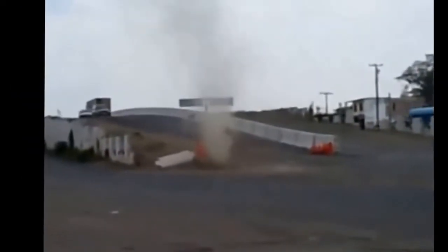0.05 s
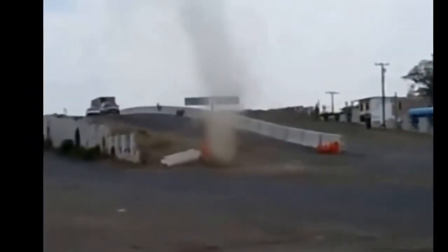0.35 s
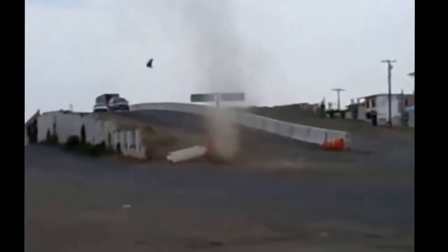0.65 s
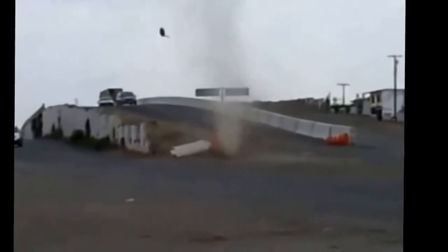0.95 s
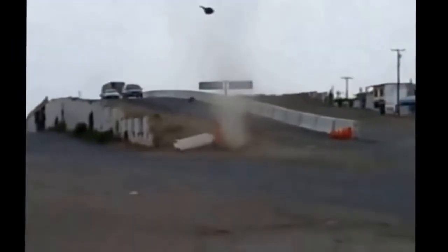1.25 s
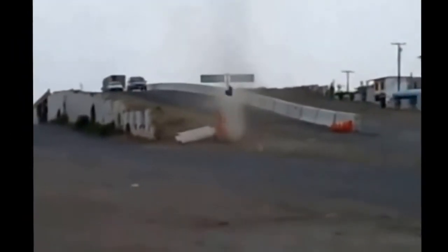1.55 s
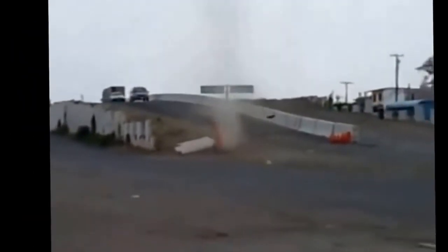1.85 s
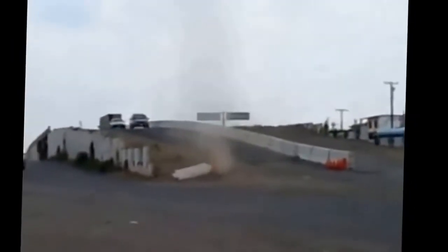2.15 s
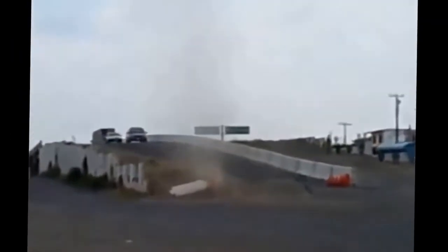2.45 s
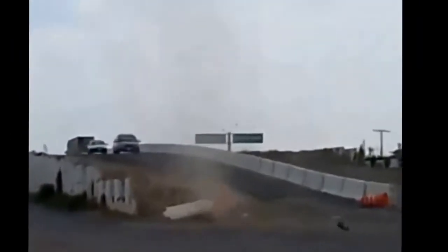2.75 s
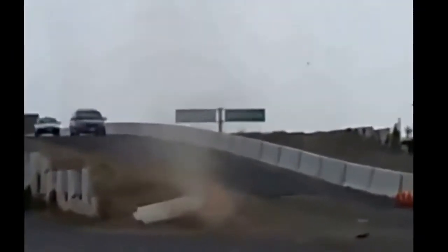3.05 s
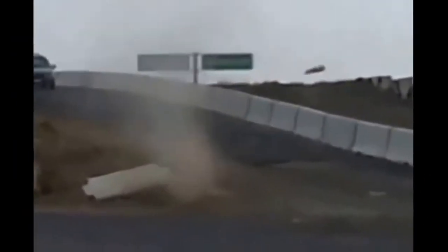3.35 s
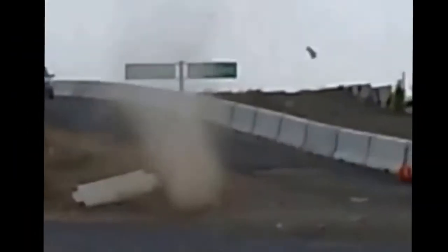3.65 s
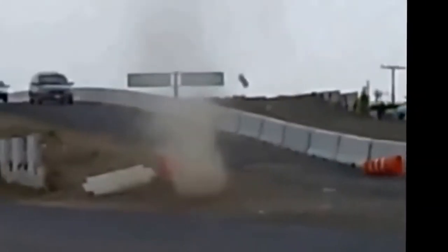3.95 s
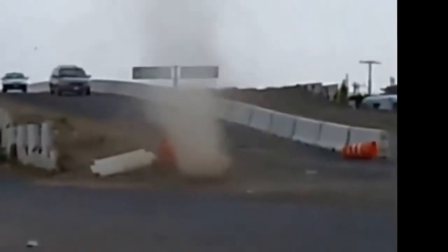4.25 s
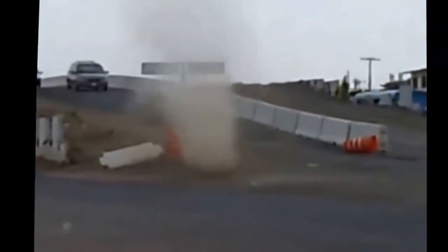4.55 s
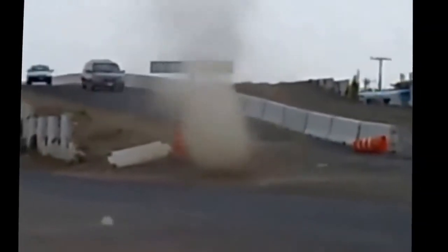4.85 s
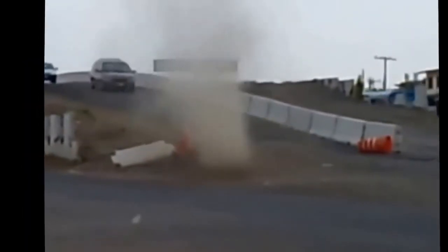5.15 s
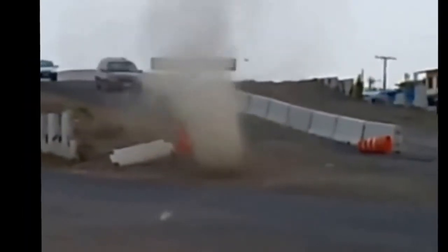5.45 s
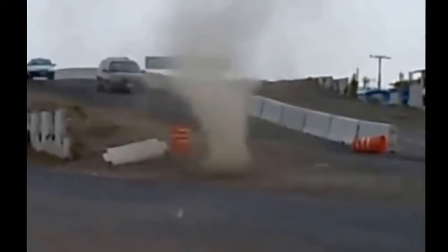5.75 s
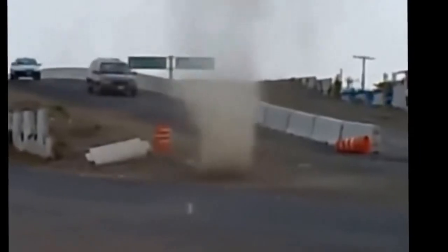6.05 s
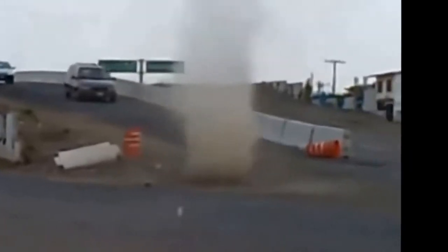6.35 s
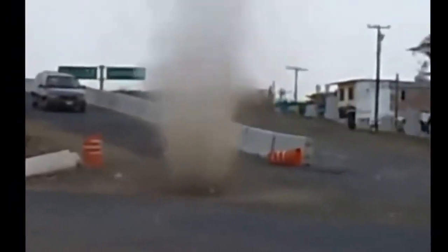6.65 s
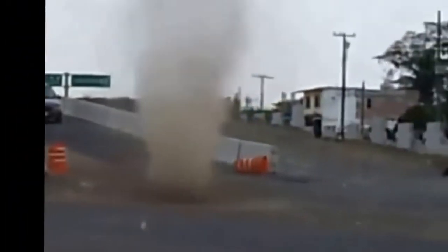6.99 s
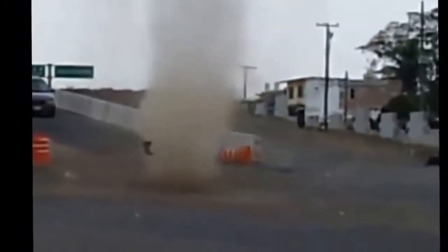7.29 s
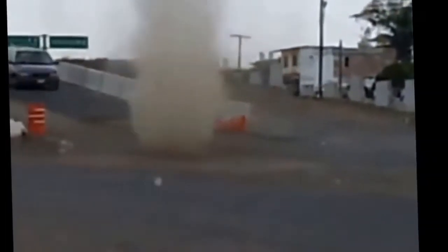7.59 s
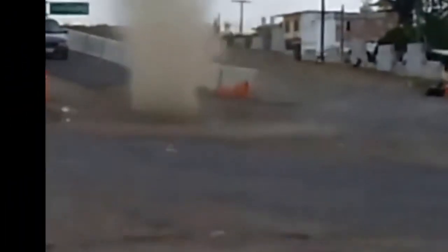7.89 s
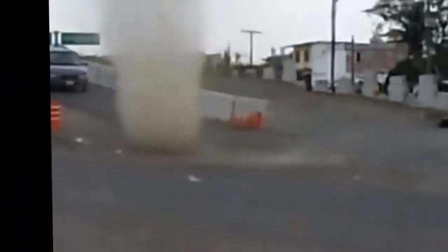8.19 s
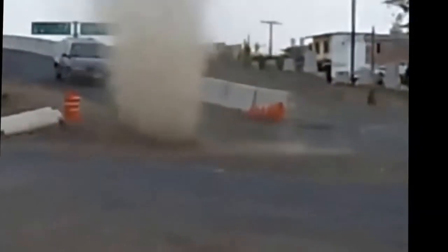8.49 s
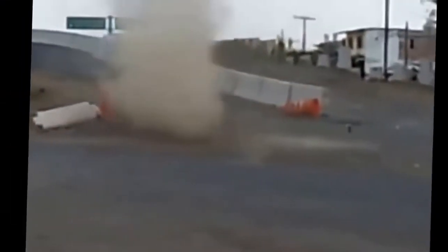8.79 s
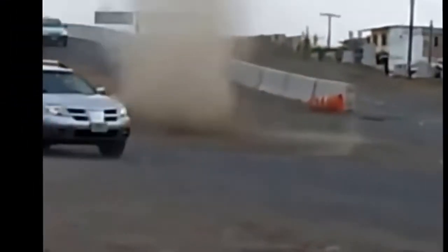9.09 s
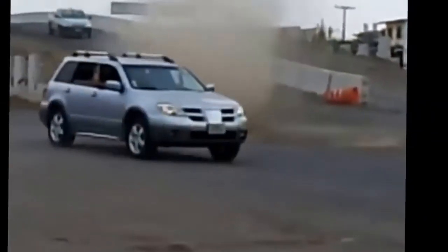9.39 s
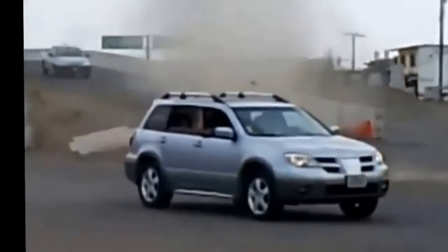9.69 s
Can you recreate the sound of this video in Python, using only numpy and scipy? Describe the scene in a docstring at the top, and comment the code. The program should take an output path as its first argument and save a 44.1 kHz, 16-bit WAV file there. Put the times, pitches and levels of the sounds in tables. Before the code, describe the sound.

Wind roars on a small camera's stereo microphone at an open roadside lot. The hardest gusts come between 0.1 and 0.7 seconds, with low thumps, rasping crackle and sharp ticks. Lighter gusts and airy swishes follow until about 3 seconds, with a few more crackles near 1.2 seconds. Another strong surge buffets the microphone from 3 to 4 seconds, then duller, rumbling gusts continue until nearly 6 seconds. Underneath throughout are the distant low roar of a dust devil and the road, a hum of car engines, a faint hiss of blown dust and a thin, wavering, breathy whistle. From about 6 seconds the close wind is much weaker, leaving the far roar and the engines, which swell and fade unevenly. Soft swishes pass between 7 and 8 seconds, and one small low buffet comes at 9.6 seconds, just before the end.

```python
"""A roadside lot, a dust devil whirling over it, heard on a small camera's stereo microphone.
Close up, gusts roar and swish past and eddies buffet the ports; the hardest gusts make them crackle.
Farther off are the roar of whirlwind and road, a hiss of blown dust, the thin whistle of the vortex
and the hum of traffic. After five seconds the wind eases and leaves the far roar and the engines."""
import sys
import numpy as np
from scipy import signal
from scipy.fft import rfft, irfft
from scipy.io import wavfile
from scipy.ndimage import uniform_filter1d, minimum_filter1d

SR = 44100
rng = np.random.default_rng(int(sys.argv[2]) if len(sys.argv) > 2 else 0)


def unload_wav(signal):
    """Save mono or channel-first audio to the path in sys.argv[1] as 16-bit WAV at rate SR, clipped to [-1, 1]."""
    wavfile.write(
        sys.argv[1],
        SR,
        np.round(np.clip(np.atleast_2d(signal).T, -1, 1) * 32767).astype(np.int16),
    )


N = 429093
TIME = np.arange(N) / SR
FREQ = np.fft.rfftfreq(N, 1 / SR)
BAND_LIMIT_HZ = 10080

# colour of a snap on the microphone: (frequency [Hz], relative level [dB])
SNAP_COLOUR = [(500, -5.5), (1300, 4), (2200, 5.5), (3200, -2), (4500, -5.5), (5500, -11.5), (7000, -17),
               (8500, -22), (10000, -27.5)]


def gain_of(db):
    """Decibels to amplitude."""
    return 10 ** (np.asarray(db) / 20)


def unit_rms(x):
    """Scales to rms 1."""
    return x / np.sqrt(np.mean(x ** 2) + 1e-20)


def over_frequency(points):
    """A table over log frequency, read at every bin."""
    hz, value = np.transpose(points)
    return np.interp(np.log(FREQ + 1), np.log(hz + 1), value)


def over_time(rows, column=1):
    """One column of a table over time, read at every sample."""
    rows = np.asarray(rows)
    return np.interp(TIME, rows[:, 0], rows[:, column])


def white_spectrum():
    """The spectrum of a fresh white noise."""
    return rng.standard_normal(len(FREQ)) + 1j * rng.standard_normal(len(FREQ))


def wander(rate_hz):
    """A random drift of rms 1, with little above the rate."""
    return unit_rms(irfft(white_spectrum() / (1 + (FREQ / rate_hz) ** 4), N))


def port_noise(colour):
    """Coloured noise at two close microphone ports: a common part plus and minus a small separate one."""
    # likeness of left and right: (frequency [Hz], coherence [0-1])
    coherence = [(30, .92), (70, 1), (130, 1), (300, 1), (550, 0.99), (1100, 0.97), (2200, 1), (3200, 0.91),
                 (4600, 0.96), (9600, 0.89)]
    alike = np.clip(over_frequency(coherence), 0, 1)
    common = np.sqrt(1 + alike) * white_spectrum()
    separate = np.sqrt(1 - alike) * white_spectrum()
    pair = np.array([common + separate, common - separate])
    return unit_rms(irfft(pair * gain_of(over_frequency(colour)), N))


def fuzzy_tone(t, hz, width_hz, steadiness):
    """A narrow band of noise round hz, from 24 scattered partials; steadiness 0-1 evens out its height."""
    offset, phase = rng.standard_normal((24, 1)), rng.random((24, 1))
    coarse_t = np.arange(t[0], t[-1] + .002, .001)
    band = np.exp(2j * np.pi * (offset * width_hz / 2 * coarse_t + phase)).sum(0)
    band = band / (abs(band) + 1) ** np.clip(steadiness, 0, 1)
    return unit_rms((np.interp(t, coarse_t, band) * np.exp(2j * np.pi * hz * t)).real)


def hump(start, length, attack, release):
    """Height 0-1 over the whole scene: rises, holds, and is gone at the end of its length."""
    return np.clip(np.minimum((TIME - start) / attack, (start + length - TIME) / release), 0, 1)


def burst(start, length, rise_s):
    """A flat-topped burst that falls half as fast as it rises: its samples and its height."""
    at = np.arange(max(int(start * SR), 0), min(int((start + length) * SR), N))
    t = TIME[at]
    return at, np.clip(np.minimum(t - t[0], (t[-1] - t) / 2) / rise_s, 0, 1)


def wind_strength(attack_s=0.018, release_s=0.066, rush_db_per_roar_db=0.36):
    """Amplitudes of rumble, roar and rush: gusts add power to the breeze; the rush follows the roar."""
    # steady wind under the gusts: (time [s], rumble [dB], roar [dB], rush [dB])
    breeze = [(0, -32, -25.5, -28.5), (1.05, -27.5, -20, -34), (2.17, -31, -27.5, -40.5),
              (2.65, -25.5, -22.5, -39), (3.1, -25.5, -22.5, -41), (3.3, -22.5, -22, -40),
              (3.6, -24, -26, -46.5), (4.15, -27, -22.5, -45.5), (4.9, -29, -26, -43),
              (5.8, -34.5, -28.5, -49), (9.73, -37, -29.5, -48.5)]
    # gusts sweeping over the microphone: (start [s], length [s], rumble [dB], roar [dB])
    gusts = [(0.109, 0.24, -19.5, -13), (0.333, 0.15, -24.5, -14.5), (0.522, 0.13, -24, -12.5),
             (0.818, 0.12, -21, -23), (1.158, 0.27, -26.5, -23.5), (1.53, 0.057, -31, -25),
             (1.715, 0.13, -38.5, -26), (1.945, 0.19, -35, -23.5), (2.22, 0.35, -28, -32),
             (2.952, 0.26, -22.5, -30), (3.166, 0.42, -26, -21), (3.302, 0.14, -28, -21),
             (3.792, 0.26, -27.5, -20), (4.296, 0.21, -26, -26.5), (4.579, 0.29, -25, -24.5),
             (5.032, 0.17, -27, -28), (5.485, 0.15, -23, -26.5), (5.783, 0.17, -32.5, -29.5),
             (6.9, .4, -35, -39.5)]
    rumble_power = gain_of(over_time(breeze, 1)) ** 2
    calm_power = gain_of(over_time(breeze, 2)) ** 2
    roar_power = calm_power
    for start, length, rumble_db, roar_db in gusts:
        power = hump(start, length, attack_s, release_s) ** 2
        rumble_power = rumble_power + power * gain_of(rumble_db) ** 2
        roar_power = roar_power + power * gain_of(roar_db) ** 2
    rush_lift = np.sqrt(roar_power / calm_power) ** rush_db_per_roar_db
    return np.sqrt(rumble_power), np.sqrt(roar_power), gain_of(over_time(breeze, 3)) * rush_lift


def wind(rumble_trim_db=-1, rush_trim_db=-1, lumpy_db=2.0, flutter_db=2.0, swell_db=1.13, dull_hz=260):
    """Turbulence at the microphone: a lumpy rumble, and a roar and rush that swell and flutter as one."""
    # colours of the wind's low, middle and airy parts: (frequency [Hz], relative level [dB])
    rumble_colour = [(15, -24.5), (35, -26), (55, -17), (68, -10.5), (82, -4), (100, -1), (125, 1.5),
                     (152, -5), (185, -1.5), (230, -1.5), (330, -26.5), (600, -61.5)]
    roar_colour = [(110, -28), (170, -6.5), (235, -3.5), (310, -1), (380, -4.5), (425, -6), (465, -3),
                   (590, -10), (720, -11.5), (1000, -20), (1400, -34.5), (3000, -73.5)]
    rush_colour = [(400, -21), (700, -3.5), (900, 2.5), (1100, -3), (1300, 2.5), (1650, -6.5), (2000, -5.5),
                   (2600, -15), (3400, -21.5), (4500, -31.5), (9000, -52)]
    # slower air sheds larger eddies, so the roar loses its top: (time [s], dull share [0-1])
    dullness = [(0, 0.01), (3.2, 0.11), (4.4, 0.93), (5.3, 0.55), (9.73, 0.6)]
    lumps, flutter, swell = lumpy_db * wander(8.8), flutter_db * wander(28), swell_db * wander(9.1)
    rumble_gain, roar_gain, rush_gain = wind_strength()
    full = port_noise(roar_colour)
    dull = unit_rms(irfft(rfft(full) / (1 + (FREQ / dull_hz) ** 2), N))
    share = np.clip(over_time(dullness), 0, 1)
    rumble = port_noise(rumble_colour) * rumble_gain * gain_of(rumble_trim_db + lumps)
    roar = ((1 - share) * full + share * dull) * roar_gain * gain_of(swell + 0.48 * flutter)
    rush = port_noise(rush_colour) * rush_gain * gain_of(rush_trim_db + swell + flutter)
    return rumble + roar + rush


def far_roar(level_db=-26.5, waver_db=.5):
    """The whirlwind and the road from a distance: a low roar that wavers slightly."""
    # colour of the far roar: (frequency [Hz], relative level [dB])
    colour = [(40, -31), (100, -5), (170, -4), (250, 1), (300, -3), (385, -1.5), (405, -7), (420, -13.5),
              (460, -6), (505, -10), (560, -5.5), (620, -10), (690, -12.5), (780, -21.5), (870, -20.5),
              (1000, -20), (1150, -27.5), (1500, -27.5), (1950, -31), (2800, -49.5)]
    return port_noise(colour) * gain_of(level_db + waver_db * wander(16.0))


def dust_hiss(shimmer_db=1.0):
    """Dust blown across the lot: a fine, shimmering hiss."""
    # colour of the hiss: (frequency [Hz], relative level [dB])
    colour = [(1200, -14.5), (2000, 14), (2700, 8), (3600, 3), (4400, 2), (5300, -4.5), (6400, -2),
              (7300, -8), (8600, -4.5), (10000, -30)]
    # rise and fall of the hiss: (time [s], level [dB])
    level = [(0, -48), (1, -60.5), (2.4, -53.5), (5, -49.5), (6, -50.5), (8, -49.5), (9.73, -51)]
    return port_noise(colour) * gain_of(over_time(level) + shimmer_db * wander(25))


def vortex_whistle(half_width_hz=150, waver=.03, flutter_db=2.1):
    """A breathy band of noise whose pitch and level waver with the spin of the vortex."""
    # course of the whistle: (time [s], pitch [Hz], level [dB])
    course = [(0, 1514, -53), (2.4, 1291, -56.5), (3.6, 1417, -56.5), (4.4, 1850, -63), (4.9, 1948, -52),
              (5.8, 1875, -57.5), (7.2, 1978, -55.5), (8.2, 1894, -54.5), (9.73, 1958, -64)]
    hz = over_time(course, 1) * (1 + waver * wander(5))
    height = gain_of(over_time(course, 2) + flutter_db * wander(12))
    band = wander(half_width_hz) + 1j * wander(half_width_hz)
    return height * (band * np.exp(2j * np.pi * np.cumsum(hz) / SR)).real


def engines(speed_drift=0.00402):
    """Cars droning on the ramp behind: all notes drift with engine speed; the upper ones come and go."""
    # notes of the hum: (pitch [Hz], width [Hz], level [dB], steadiness [0-1])
    notes = [(129.1, 4, -31.5, 0.9), (238.4, 10, -32, .6), (400.2, 6, -39.5, 0.3), (485, 8, -41.5, .3),
             (578.5, 8, -39, 0.4)]
    # swell of the hum: (time [s], gain of the lowest note [dB], gain of the upper notes [dB])
    swells = [(0, -2, -3.5), (3, -9, -3), (5.1, -3, -2.5), (5.5, -1.5, -2.5), (6.05, -1, -3.5),
              (6.25, -3.5, 1), (6.45, 1.5, 0.5), (6.7, -5.5, -5), (7.0, 1, 3), (7.25, -3.5, 4),
              (7.48, 4, 1), (7.68, -10, -3.5), (7.87, -2, 1.5), (8.08, -5.5, 1.5), (8.35, 2.5, 0.5),
              (8.85, 3, -2), (9.2, -2.5, -2.5), (9.73, 0, 2)]
    clock = TIME + np.cumsum(speed_drift * wander(1.495)) / SR
    out = np.zeros(N)
    for index, (hz, width, db, steadiness) in enumerate(notes):
        swell = over_time(swells, 1 if index == 0 else 2)
        out += gain_of(db + swell) * fuzzy_tone(clock, hz, width, steadiness)
    return out


def swishes(stereo_spread=0.47, flutter_db=1.0):
    """Fast air sweeps by: a fluttering noise band that swells and fades, a little unlike at each port."""
    # passes of fast air: (middle [s], length [s], level [dB], centre [Hz], width [Hz])
    passes = [(0.019, 0.041, -25, 1490, 600), (0.573, .09, -24, 1100, 1300), (1.028, 0.15, -31, 1510, 1200),
              (1.158, 0.11, -35.5, 1890, 1600), (1.56, 0.054, -31, 1300, 900),
              (2.329, 0.17, -31, 1130, 900), (2.566, 0.24, -35.5, 1140, 800),
              (2.662, 0.062, -36, 1390, 1200), (2.743, 0.15, -32.5, 1250, 1100),
              (3.243, .16, -40, 1370, 1200), (3.394, 0.13, -35, 1160, 900), (4.868, .16, -50, 2210, 1800),
              (5.05, .2, -51, 1950, 600), (6.877, .12, -45, 1940, 700), (7.23, .12, -46, 1960, 550),
              (7.48, 0.16, -46, 1850, 800), (7.05, .5, -28, 255, 69.4), (7.537, 0.23, -31, 540, 260),
              (8.023, 0.15, -31, 550, 200), (8.052, .3, -48, 1850, 798)]
    air = rng.standard_normal(N) + stereo_spread * rng.standard_normal((2, N))
    air *= gain_of(flutter_db * wander(40))
    out = np.zeros((2, N))
    for middle, length, db, hz, width in passes:
        height = hump(middle - length / 2, length, length / 2, length / 2)
        at = np.flatnonzero(height)
        band = signal.butter(3, [hz - width / 2, hz + width / 2], "bandpass", fs=SR, output="sos")
        out[:, at] += gain_of(db) * height[at] * unit_rms(signal.sosfilt(band, air[:, at]))
    return out


def crackle(pressure, snaps_per_s=3800, uneven_db=3, stereo_spread=0.099):
    """The microphone rasps with tiny uneven snaps, crowded on the crests of the pressure swings."""
    # spells of crackle in the hardest gusts: (start [s], length [s], level [dB])
    spells = [(.005, 0.048, -44), (0.112, 0.046, -25.5), (0.151, .072, -24.5), (0.216, 0.13, -32.5),
              (0.251, 0.044, -30), (0.346, 0.054, -27), (0.388, 0.06, -44), (0.539, 0.058, -30.5),
              (0.737, 0.014, -50.5), (0.821, 0.04, -42.5), (1.137, 0.023, -51.5), (1.213, 0.044, -41),
              (1.548, 0.032, -51)]
    crest = pressure ** 2 / (uniform_filter1d(pressure ** 2, size=500) + 1e-9)
    sizes = rng.choice([-1, 1], N) * gain_of(uneven_db * rng.standard_normal(N))
    fires = rng.random(N) < crest * snaps_per_s / SR
    snaps = fires * sizes * (1 + stereo_spread * rng.standard_normal((2, N)))
    out = np.zeros((2, N))
    for start, length, db in spells:
        at, height = burst(start, length, rise_s=0.0043)
        out[:, at] += gain_of(db) * unit_rms(height * snaps[:, at])
    colour = unit_rms(gain_of(over_frequency(SNAP_COLOUR)))
    return irfft(rfft(out) * colour, N)


def buffets(steadiness=0.78):
    """Each eddy shakes the air in the port with a short low flutter, from a broad thump to a near hoot."""
    # eddies hitting the microphone: (start [s], length [s], level [dB], centre [Hz], width / centre [-])
    eddies = [(0.108, 0.05, -5.5, 183, 0.23), (0.111, 0.11, -12.5, 119.4, 0.17),
              (0.108, 0.05, -18.5, 430, .3), (0.166, 0.07, -10.5, 210, 0.24),
              (0.267, .05, -16.5, 121.3, .2), (0.252, .17, -17.5, 474.5, .25),
              (0.441, .07, -19.5, 298.5, .2), (0.482, 0.05, -18.5, 464, .15),
              (0.542, 0.05, -16.5, 105, 0.34), (0.551, 0.11, -14, 180.3, 0.098),
              (0.733, 0.053, -21.5, 255, 0.27), (0.824, 0.05, -18.5, 134.6, .25),
              (1.193, .12, -17.5, 385, .2), (1.555, 0.055, -21.5, 299, 0.16), (2.02, .07, -22, 304.3, 0.16),
              (2.754, .045, -21.5, 220, .3), (2.992, 0.05, -13.5, 301, 0.085),
              (3.163, .095, -12.5, 240.5, .28), (3.167, 0.12, -16.5, 102.5, .22),
              (3.24, .07, -13.5, 199, .15), (3.32, 0.085, -17, 101.6, 0.19), (3.335, 0.07, -15, 222.2, .22),
              (4.335, 0.041, -17.5, 97, .2), (4.381, 0.075, -20, 145, .3), (4.608, 0.039, -22.5, 313, .25),
              (4.686, .06, -21, 238.6, .13), (4.732, 0.084, -27.5, 118, .3), (4.751, 0.1, -20.5, 295, .3),
              (4.945, .115, -21, 238.6, .1), (5.057, 0.085, -23, 109, .2), (9.567, 0.06, -22, 240.5, 0.08)]
    out = np.zeros(N)
    for start, length, db, hz, spread in eddies:
        at, height = burst(start, length, rise_s=0.0039)
        out[at] += gain_of(db) * height * fuzzy_tone(TIME[at], hz, spread * hz, steadiness)
    return out


def ticks(decay_s=.0011, tilt_db_per_octave=1.5):
    """Lone snaps on the microphone: a spit of noise, bright or dull, that dies at once."""
    # single sharp ticks: (time [s], level before filtering [dB], low-pass corner [Hz])
    hits = [(0.1105, -17.5, 2500), (0.125, -16, 5000), (0.303, -23.5, 10000), (0.38, -19, 9000),
            (0.467, -27.5, 14000), (.497, -34, 16000), (0.598, -32, 8000), (1.218, -26, 14000),
            (1.244, -28, 14000), (3.231, -26, 3300), (3.331, -28.5, 3600)]
    out = np.zeros(N)
    for start, db, top_hz in hits:
        at = np.flatnonzero((TIME >= start) & (TIME < start + 10 * decay_s))
        spit = rng.standard_normal(N)[at] * np.exp((start - TIME[at]) / decay_s)
        out[at] += gain_of(db) * signal.lfilter(*signal.butter(2, top_hz, fs=SR), spit)
    brighter_db = tilt_db_per_octave * np.log2(np.minimum(FREQ, BAND_LIMIT_HZ) + 1)
    colour = unit_rms(gain_of(over_frequency(SNAP_COLOUR) + brighter_db))
    return irfft(rfft(out) * colour, N)


def scene():
    """Close wind and its crackle over the far sounds, as the microphone's two ports take them."""
    # balance of the ports: (frequency [Hz], left minus right [dB])
    balance = [(40, -3), (150, -3), (350, -3), (600, -3.5), (1000, -1.5), (1800, -2), (3500, -2.5),
               (5500, -2.5), (9600, -3)]
    # lead of the left port over the right: (frequency [Hz], phase [rad])
    left_lead = [(100, 0.07), (1150, 0.14), (2000, 0.69), (2900, 0.98), (3500, 0), (10000, 0.13)]
    close_wind = wind() + buffets()
    air = close_wind + crackle(close_wind.mean(0)) + ticks()
    air = air + far_roar() + dust_hiss() + vortex_whistle() + swishes() + engines()
    left_port = gain_of(over_frequency(balance) / 2) * np.exp(.5j * over_frequency(left_lead))
    return irfft(rfft(air) * np.array([left_port, 1 / left_port]), N)


def record(dry, ceiling=.79, overload=.72, knee=5):
    """A quick limiter holds the hardest gusts down, overload rounds their crests; then the band limit."""
    allowed_gain = (1 + (abs(dry).max(0) / ceiling) ** knee) ** (-1 / knee)
    held = dry * uniform_filter1d(minimum_filter1d(allowed_gain, size=300), size=300)
    rounded = held * (1 + (abs(held) / overload) ** knee) ** (-1 / knee)
    low_pass = signal.firwin(701, BAND_LIMIT_HZ, window=("kaiser", 9), fs=SR)
    return signal.oaconvolve(rounded, low_pass[None], "same")


dry = scene()
out = record(dry)
unload_wav(out)
```